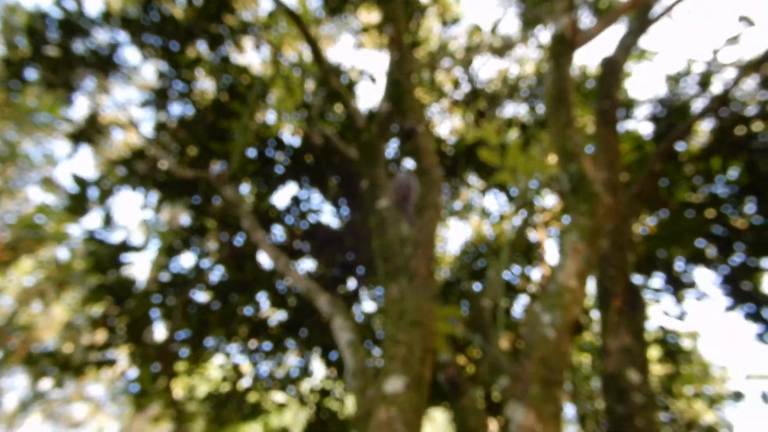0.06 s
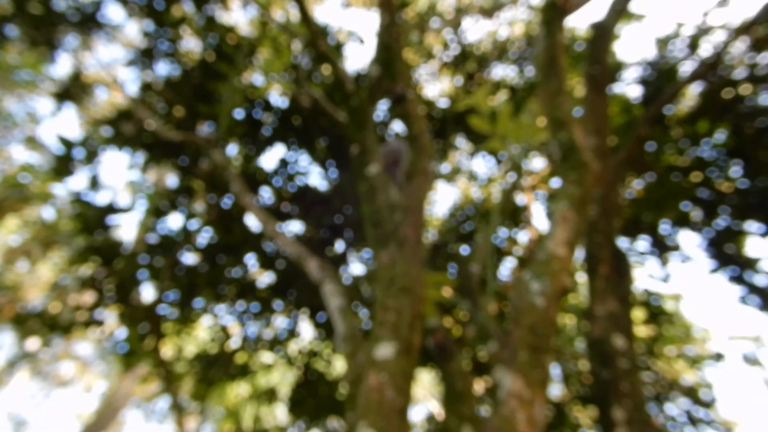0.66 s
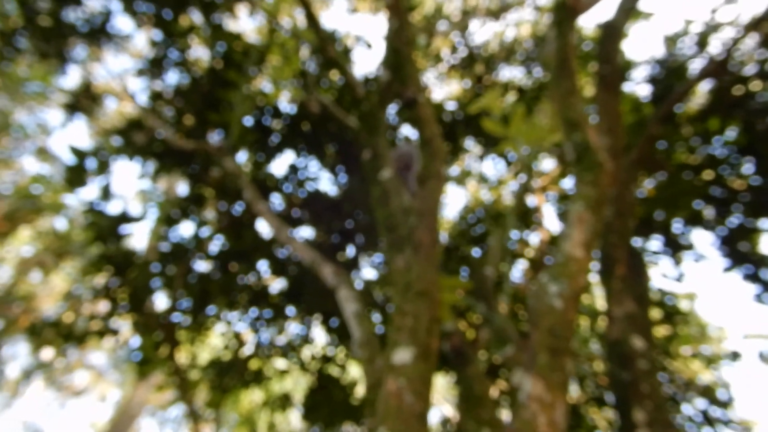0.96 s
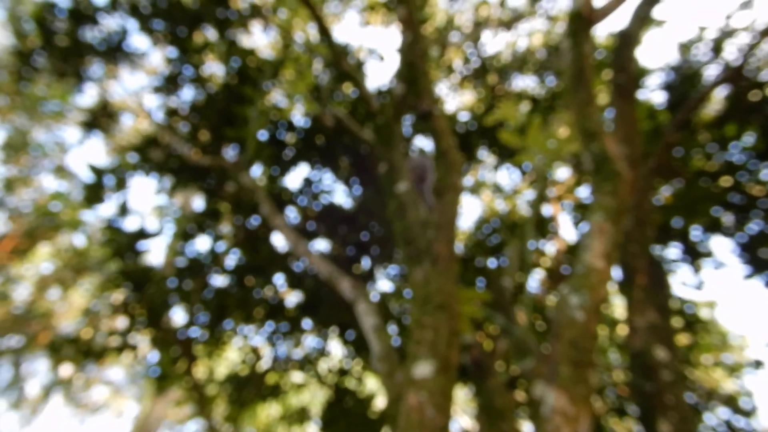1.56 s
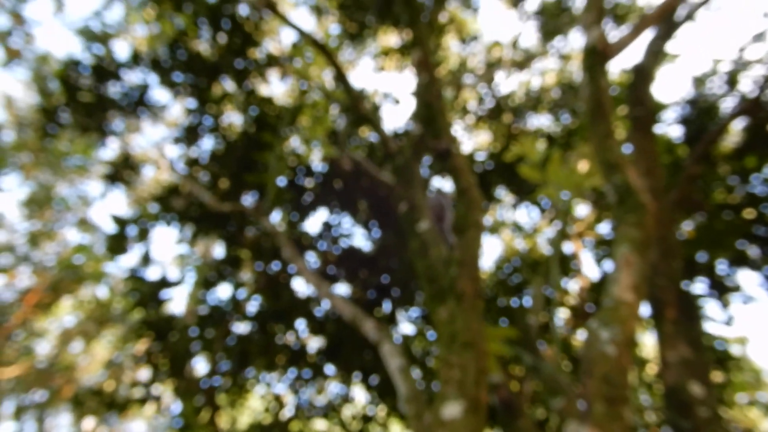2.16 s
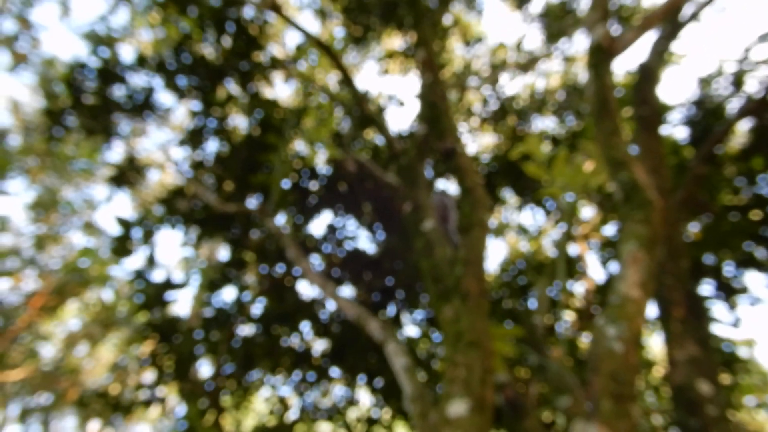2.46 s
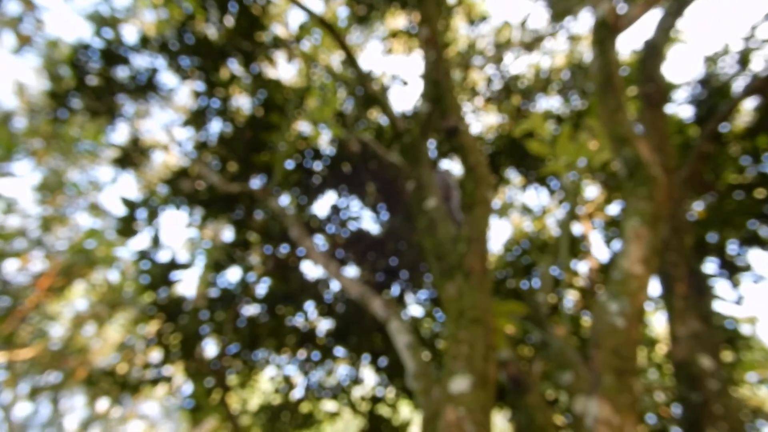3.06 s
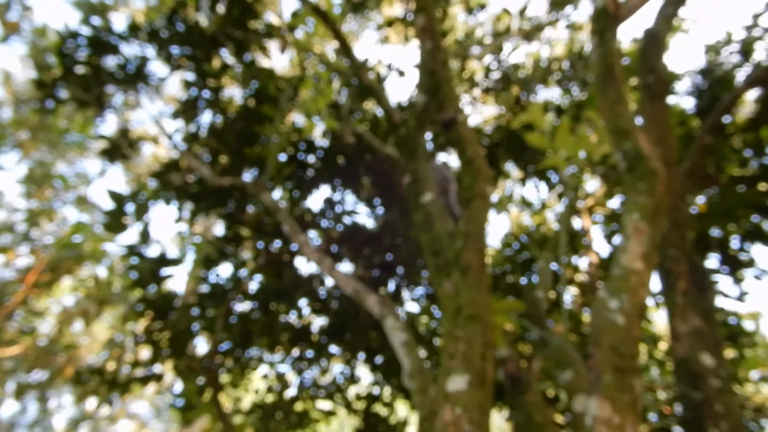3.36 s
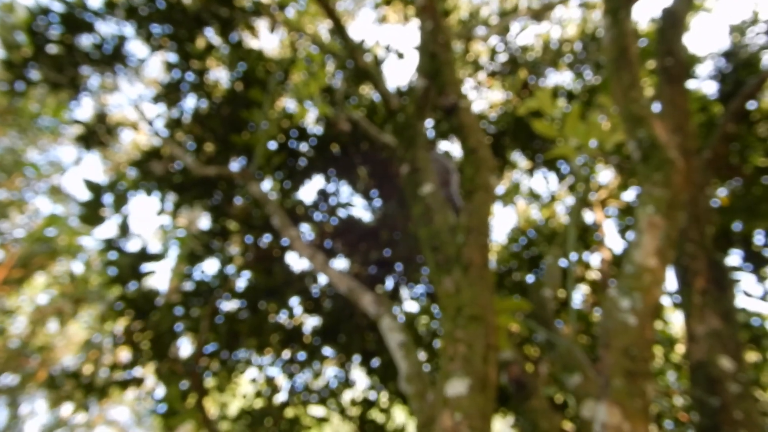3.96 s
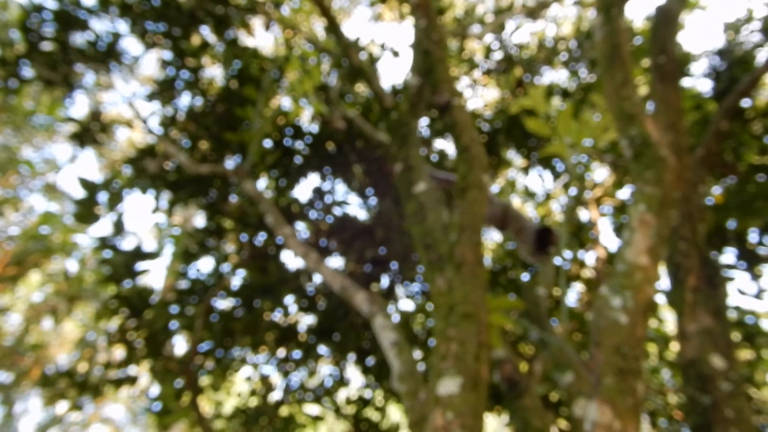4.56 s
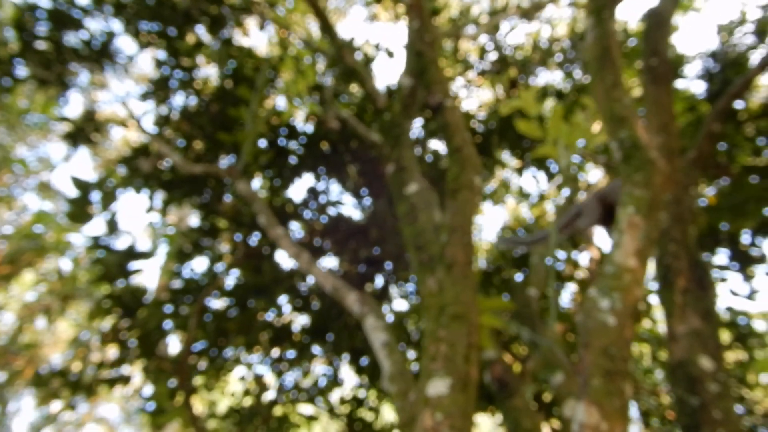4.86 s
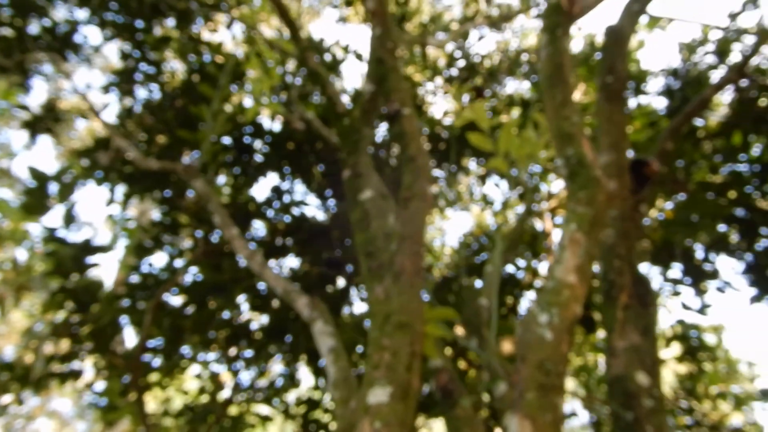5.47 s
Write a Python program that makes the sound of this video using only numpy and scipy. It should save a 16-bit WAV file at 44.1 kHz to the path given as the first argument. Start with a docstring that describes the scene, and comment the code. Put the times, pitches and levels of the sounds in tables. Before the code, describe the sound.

A thin rising whistle, then loud, high chirps and faint trills from marmosets in trees, over a low distant rumble.

```python
"""A long rising whistle, then loud falling chirps, trills and one sharp tsik: marmosets in garden trees.
Each call is a gliding, nearly pure tone that trunks and leaves scatter into a ringing tail.
The distance rumbles, an insect buzzes, clicks sound at the camera, a far bird pips in pairs, leaves stir.
The camera's gain control ducks the garden after the loudest chirps."""
import sys
import numpy as np
from scipy import signal
from scipy.fft import rfft, irfft, next_fast_len
from scipy.io import wavfile
from scipy.ndimage import map_coordinates

SR = 44100
rng = np.random.default_rng(int(sys.argv[2]) if len(sys.argv) > 2 else 0)


def generate_wav(signal):
    """Clip the signal to [-1, 1] and save it as 16-bit WAV at the path in sys.argv[1]."""
    frames = np.transpose(np.atleast_2d(signal))
    scaled = np.clip(frames, -1, 1) * 32767
    pcm = np.round(scaled).astype(np.int16)
    wavfile.write(sys.argv[1], SR, pcm)


N = 251370
TIME = np.arange(N) / SR

# Decay of the leaf scatter: f/Hz, t60/s
SCATTER_T60 = [(1000, 0.074), (3000, 0.49), (5000, 0.5), (8000, 0.48), (12000, 0.37)]
# Left-right likeness of noise: f/Hz, correlation
STEREO_CORRELATION = [(50, 0.82), (150, 0.9), (1000, 0.76), (4000, 0.74), (12000, 0.54)]
# Distant rumble: f/Hz, level/dB
RUMBLE_SPECTRUM = [(20, -26.5), (40, -10.5), (65, 2), (100, -5), (250, -6), (380, -13), (500, -13.5),
                   (750, -21.5), (1000, -19), (1300, -37), (2500, -47.5), (6000, -78)]
# Thin hiss: f/Hz, level/dB
HISS_SPECTRUM = [(300, -8.5), (1400, -4), (2000, 1), (3700, -2.5), (5500, -2), (8000, -12.5),
                 (10000, -19.5), (14500, -21.5), (16000, -31.5)]
# Ticks at the camera: t/s, level/dB, t60/s
TICKS = [(0.063, -42, 0.02), (.494, -49, .02), (0.557, -42, 0.027), (.608, -49.5, .018),
         (.782, -46.5, 0.016), (1.013, -46.5, .015), (1.231, -41, .04), (1.594, -37.5, 0.021),
         (1.687, -41, .022), (2.516, -34.5, 0.055), (2.52, -28, 0.0081), (2.673, -39.5, 0.016),
         (2.856, -39.5, 0.0102), (3.302, -42.5, .02), (4.069, -35.5, 0.063), (4.078, -31.5, 0.026),
         (5.07, -47, .1), (5.509, -47, 0.11)]
# Tick colour: f/Hz, level/dB
TICK_SPECTRUM = [(100, 0), (800, -2.5), (1400, -18), (2000, -1), (3300, -2), (6000, -18.5), (10000, -22.5),
                 (15000, -41)]
# Bright crack of a hard tick: f/Hz, level/dB
CRACK_SPECTRUM = [(3000, -2), (9500, -4), (12000, -5.5), (15000, -15)]
# Soft knocks on the camera body: t/s, level/dB
BODY_KNOCKS = [(.066, -16.5), (0.086, -23), (2.513, -24), (3.04, -28.5), (3.599, -24.5), (4.0651, -25.5)]
# Patches of high fizz: centre/s, level/dB, half length/s
FIZZ_PATCHES = [(.77, -60, .025), (1.078, -61, .015), (1.252, -60.5, .018)]
# Marmoset chirps: t/s, length/s, f/Hz, drop/Hz, drop time/s, closing flick/Hz, soft lead-in/s,
# level/dB, base overtone/dB, scatter/dB
CHIRP_CALLS = [ (0.891, 0.08, 5930, 436, .046, 651, 0.015, -12.5, -40.5, -5.5),
               (1.384, 0.068, 5183, 49.8, 0.023, 102.5, 0.041, -23, -41.5, -2),
               (1.711, 0.067, 5552, 285, .03, 848, 0.011, -10, -37.5, -4.5),
               (2.219, 0.078, 5237, 90, 0.024, -5.5, 0.036, -21.5, -44.5, -3.5),
               (2.352, 0.046, 5170, 29.7, .02, -4, 0.014, -29.5, -47, -12.5),
               (2.594, .080, 5484, 847, .025, 1099.5, 0.013, -11.5, -41.5, -7.5),
               (3.136, 0.077, 5262, 600, 0.026, 1098, 0.024, -7, -37, -8),
               (3.606, 0.072, 5230, 582, .025, 1102, 0.036, -6.5, -38.5, -7.5),
               (4.655, 0.065, 5440, 50, .02, 851.5, .043, -26.5, -59.5, -6.5),
               (4.882, 0.082, 5314, 518, .031, 1202, 0.026, -12, -37.5, -3.5),
               (5.35, 0.08, 4907, 381, .042, 1200, 0.0051, -13, -41.5, -5.5), ]
# Far bird's pip pairs: centre of first pip/s, unsounded fundamental/Hz, level/dB
PIP_PAIRS = [(1.09, 930, -57.5), (1.925, 890, -54.5), (2.796, 922, -52), (3.337, 902, -52.5),
             (3.815, 935, -53.5), (4.389, 892, -54.5), (5.099, 865, -55), (5.571, 870, -56)]
# Marmoset trills: t/s, length/s, f/Hz, climb/(Hz/s), flutter rate/Hz, flutter crest/s, flutter depth/Hz,
# level/dB, base overtone re level/dB, direct path/dB
TRILL_CALLS = [ (1.407, 0.12, 6040, 1990, 31, 1.431, 293, -37, -18.5, 3.5),
               (2.225, 0.12, 5490, 4920, 20, 2, 268, -36, -15, -18),
               (5.289, 0.38, 4836, 6240, 25, 5, 186, -45, -6, -15), ]
# Stirring leaves: f/Hz, level/dB
LEAF_SPECTRUM = [(1000, -31.5), (2000, -2), (3300, 9), (4200, 3), (6000, -24), (9000, -39.5),
                 (12000, -31.5)]
# Marmoset alarm note: t/s, f/Hz, level/dB
TSIK_CONTOUR = [(4.193, 2392, -51), (4.205, 2957, -28), (4.218, 3787, -20), (4.221, 4646, -24),
                (4.231, 4974, -10), (4.246, 4964, -14.5), (4.253, 5220, -19.5), (4.267, 2986, -30)]


def amp(db):
    """Decibels to gain."""
    return 10 ** (np.asarray(db) / 20)


def unit(x):
    """Scale to rms 1."""
    return x / np.sqrt(np.mean(x ** 2) + 1e-20)


def along(points, hz):
    """Read (f/Hz, value) points on a log axis."""
    f, values = np.transpose(points)
    return np.interp(np.log(hz + 1), np.log(f + 1), values)


def ramp(x, start, length):
    """Linear rise from 0 to 1, then hold."""
    return np.clip((x - start) / length, 0, 1)


def span(start_s, length_s, fade_s=.003):
    """Times and soft on-off gate of one call."""
    t = np.arange(start_s, start_s + length_s, 1 / SR)
    edge_s = np.minimum(t - t[0], t[-1] - t)
    return t, np.sin(np.pi / 2 * ramp(edge_s, 0, fade_s)) ** 2


def wobble(rate_hz, t):
    """Smooth random curve with knots at rate_hz."""
    knot = (t - t[0]) * rate_hz
    return map_coordinates(rng.standard_normal(int(knot[-1]) + 4), [knot + 1])


def filtered(x, response):
    """Apply a gain that depends on frequency."""
    size = next_fast_len(N + 8192)
    return irfft(rfft(x, size) * response(np.fft.rfftfreq(size, 1 / SR)), size)[..., :N]


def add(track, start_s, sound):
    """Mix a sound into a track."""
    i = int(np.clip(round(start_s * SR), 0, N - 1))
    track[..., i:i + sound.shape[-1]] += sound[..., :N - i]


def pan(left_db):
    """Channel gains for a left-right difference."""
    return amp([[left_db / 2], [-left_db / 2]])


def noise(spectrum):
    """Coloured stereo noise, rms 1, channels partly correlated."""
    def response(hz):
        angle = np.arccos(np.clip(along(STEREO_CORRELATION, hz), -1, 1)) / 2
        return amp(along(spectrum, hz)) * [np.cos(angle), np.sin(angle)]
    mid, side = filtered(rng.standard_normal((2, N)), response)
    return unit(np.array([mid + side, mid - side]))


def grove(call, leaves_db, trunks_db, direct=1, side_db=-9, delay_s=.009, spread_s=.04, echoes=48):
    """Direct sound, early echoes off trunks and branches, then scatter from the leaves."""
    hz, t, spectra = signal.stft(rng.standard_normal((2, SR * 3 // 4)), SR, nperseg=256)
    swell = 1 - np.exp(-t / delay_s)
    decay = amp(-60 * t / along(SCATTER_T60, hz)[:, None])
    paths = signal.istft(spectra * swell * decay, SR, nperseg=256)[1]
    paths *= amp(leaves_db) / np.linalg.norm(paths[0])
    lags = ((delay_s + spread_s * rng.random(echoes) ** 2) * SR).astype(int)
    paths[:, lags] += amp(trunks_db) / np.sqrt(echoes) * rng.standard_normal((2, echoes))
    mid, side = signal.fftconvolve(call[None], paths, axes=1)
    mid[:len(call)] += direct * call
    return np.array([mid + amp(side_db) * side, mid - amp(side_db) * side])


def voice(t, hz, db, overtone_db, jitter):
    """Marmoset voice: a slightly unsteady sine and a weak octave overtone."""
    phase = 2 * np.pi * np.cumsum(hz * (1 + jitter * wobble(900, t))) / SR
    return amp(db) * np.sin(phase) + amp(overtone_db) * np.sin(2 * phase)


def whistle(length_s=.5, pitch_hz=7608, climb_hz=870, hold_s=.08, climb_s=.39, release_s=.19):
    """Pure contact call: holds its pitch, then climbs ever faster as it fades."""
    out = np.zeros((2, N))
    t, gate = span(0, length_s)
    hz = pitch_hz + climb_hz * ramp(t, hold_s, climb_s) ** 1.5
    db = -19.5 - 10 * t - 25 * ramp(t, length_s - release_s, release_s) ** 2
    call = gate * voice(t, hz, db, db - 70, jitter=.0004)
    add(out, t[0], grove(call, leaves_db=-6, trunks_db=-3, side_db=-6))
    return out * pan(-1.5)


def background(rumble_db=-47, hiss_db=-60):
    """Distant rumble and thin hiss, both wavering slightly."""
    rumble = amp(rumble_db + .8 * wobble(12, TIME)) * noise(RUMBLE_SPECTRUM) * pan(-2.6)
    hiss = amp(hiss_db + 1.5 * wobble(11, TIME)) * noise(HISS_SPECTRUM)
    return rumble + hiss


def insect(centre_hz=4420, width_hz=80, overtone_hz=8900, level_db=-53, swell_at_s=.12):
    """Narrow-band rasping buzz: swells in, then pulses unevenly."""
    def response(hz):
        main = (1 + ((hz - centre_hz) / width_hz) ** 2) ** -1.3
        overtone = (1 + ((hz - overtone_hz) / (2 * width_hz)) ** 2) ** -1.3
        return main + amp(-32) * overtone
    white = noise([(1000, 0)])
    buzz = unit(filtered(white, response))
    swell_db = -9 * (1 - ramp(TIME, swell_at_s, .048))
    pulsing_db = 3 * np.tanh(1.5 * wobble(40, TIME))
    return buzz * amp(level_db + swell_db + pulsing_db)


def camera_clicks(knock_hz=210, knock_t60_s=.0092, crack_db=-24, crack_t60_s=.006):
    """Dry ticks, the hardest with a bright crack, and dull knocks on the body."""
    ticks, cracks, knocks = np.zeros((3, N))
    t = np.arange(SR // 8) / SR
    hardest_db = max(db for _, db, _ in TICKS)
    for start_s, db, t60_s in TICKS:
        add(ticks, start_s, amp(db - 60 * t / t60_s))
        add(cracks, start_s, amp(crack_db + 3.4 * (db - hardest_db) - 60 * t / crack_t60_s))
    for start_s, db in BODY_KNOCKS:
        add(knocks, start_s, -amp(db - 60 * t / knock_t60_s) * np.sin(2 * np.pi * knock_hz * t))
    return ticks * noise(TICK_SPECTRUM) + cracks * noise(CRACK_SPECTRUM) + knocks


def fizz(grain_db=5):
    """Brief, faint patches of grainy high fizz."""
    swell = sum(amp(db) * np.exp(-((TIME - at_s) / half_s) ** 2) for at_s, db, half_s in FIZZ_PATCHES)
    grains = amp(grain_db * wobble(400, TIME))
    treble = noise([(4000, -14), (8000, 1), (13000, -7.5), (16000, -24.5)])
    return swell * unit(grains * treble)


def chirps(scoop_hz=304, scoop_s=.008, lead_db=19.5, open_s=.009, flick_s=.013):
    """Chirps scoop up, open and grow hoarser. Most drop, then flick up; a few soft ones stay near level."""
    out = np.zeros((2, N))
    for (start_s, length_s, pitch_hz, drop_hz, drop_s, flick_hz, lead_s,
         level_db, base_overtone_db, scatter_db) in CHIRP_CALLS:
        t, gate = span(start_s, length_s)
        turn_s = start_s + length_s - flick_s
        scoop = np.exp((start_s - t) / scoop_s)
        lead_in = (1 - np.tanh((t - start_s - lead_s) / open_s)) / 2
        drop = np.sin(np.pi / 2 * ramp(t, turn_s - drop_s, drop_s)) ** 2
        flick = ramp(t, turn_s, flick_s)
        hz = pitch_hz - scoop_hz * scoop - drop_hz * drop + flick_hz * np.sin(np.pi / 2 * flick) ** 2
        db = level_db - 10 * scoop - lead_db * lead_in - 5.5 * flick + 1.4 * wobble(181, t)
        overtone_db = base_overtone_db + .45 * (db + 9.5) + 2 * wobble(150, t)
        overtone_db += 5 * (drop - .5) - 8 * flick
        call = gate * voice(t, hz, db, overtone_db, jitter=.0019 + .0031 * drop)
        direct = (1 - flick) ** 2  # the ending is heard mostly as scatter
        add(out, t[0], grove(call, scatter_db, scatter_db + 1, direct, side_db=-11, delay_s=.008))
    return out * pan(-.6)


def far_bird(length_s=.042, gap_s=.12, step_hz=14, fourth_db=1):
    """Paired pips of third and fourth harmonics; the second pip is slightly higher."""
    out = np.zeros((2, N))
    t = np.arange(0, length_s, 1 / SR)
    envelope = np.sin(np.pi * t / length_s)
    for centre_s, pitch_hz, db in PIP_PAIRS:
        for k in range(2):
            hz = (pitch_hz + k * step_hz) * (1 + .017 * wobble(560, t))
            phase = 2 * np.pi * np.cumsum(hz) / SR
            pip = amp(db) * envelope * (np.sin(3 * phase) + amp(fourth_db) * np.sin(4 * phase))
            add(out, centre_s + k * gap_s - length_s / 2, grove(pip, leaves_db=-6, trunks_db=-8))
    return out


def trills(attack_s=.02, onset_db=10):
    """Softer calls whose pitch flutters as it climbs; the highest notes lose their overtone."""
    out = np.zeros((2, N))
    for (start_s, length_s, pitch_hz, climb_hz_per_s, rate_hz, crest_s, depth_hz,
         level_db, base_overtone_db, direct_db) in TRILL_CALLS:
        t, gate = span(start_s, length_s)
        flutter_hz = depth_hz * np.cos(2 * np.pi * rate_hz * (t - crest_s))
        hz = pitch_hz + climb_hz_per_s * (t - start_s) + flutter_hz
        db = level_db - onset_db * (1 - ramp(t, start_s, attack_s))
        overtone_db = db + base_overtone_db - 22 * ramp(hz, 5900, 1100)
        call = gate * voice(t, hz, db + 1.5 * wobble(120, t), overtone_db, jitter=.008)
        add(out, t[0], grove(call, leaves_db=-7.5, trunks_db=-8.5, direct=amp(direct_db)))
    return out


def leaf_stir(peak_s=2.31, peak_db=-51.5, rise_db_per_s=29, fall_db_per_s=96.5):
    """One rustle of leaves: builds, then dies quickly."""
    db = peak_db - np.maximum(rise_db_per_s * (peak_s - TIME), fall_db_per_s * (TIME - peak_s))
    return amp(db + 2.4 * wobble(45, TIME)) * noise(LEAF_SPECTRUM)


def tsik():
    """Alarm note: rasping upsweep, clear held top, quick drop."""
    out = np.zeros((2, N))
    knots_s, knots_hz, knots_db = np.transpose(TSIK_CONTOUR)
    t, gate = span(knots_s[0], knots_s[-1] - knots_s[0])
    hz = np.interp(t, knots_s, knots_hz)
    db = np.interp(t, knots_s, knots_db)
    rasp = np.interp(hz, [3800, 4800], [1, 0])
    overtone_db = -48 + .19 * (db + 4) + 15 * rasp
    call = gate * voice(t, hz, db, overtone_db, jitter=.004 + .045 * rasp)
    add(out, t[0], grove(call, leaves_db=-5, trunks_db=-3.5))
    return out * pan(-1.3)


def gain_control(x, limit_db=-14, attack_s=.0054, recover_db_per_s=11.5):
    """Turns down fast above the limit, recovers slowly."""
    step = 1 / (attack_s * SR)
    smooth = lambda v: signal.lfilter([step], [1, step - 1], v)
    power = smooth(np.mean(x ** 2, axis=0))
    over_db = np.maximum(10 * np.log10(power + 1e-12) - limit_db, 0)
    recovery_db = recover_db_per_s * TIME
    cut_db = np.maximum.accumulate(over_db + recovery_db) - recovery_db
    return x * amp(-smooth(cut_db))


def scene():
    """Everything that reaches the two microphones."""
    return (whistle() + background() + insect() + camera_clicks() + fizz()
            + chirps() + far_bird() + trills() + leaf_stir() + tsik())


def record(dry):
    """The camera's gain control, then its band limit."""
    return filtered(gain_control(dry), lambda hz: hz < 15800)


dry = scene()
out = record(dry)
generate_wav(out)
```